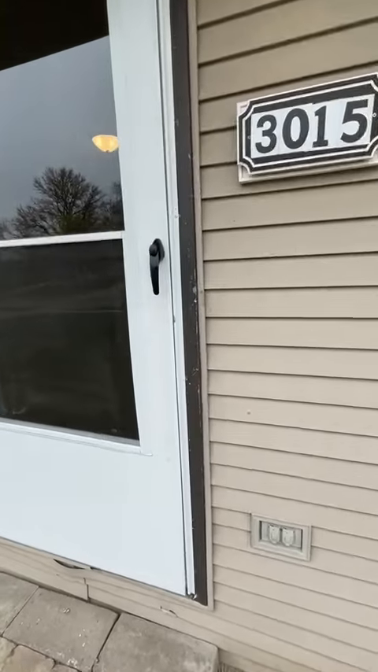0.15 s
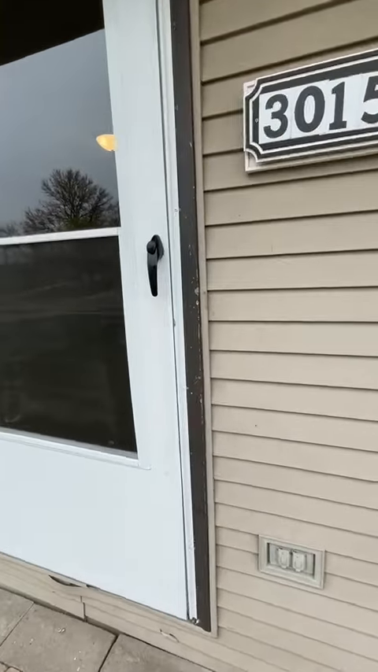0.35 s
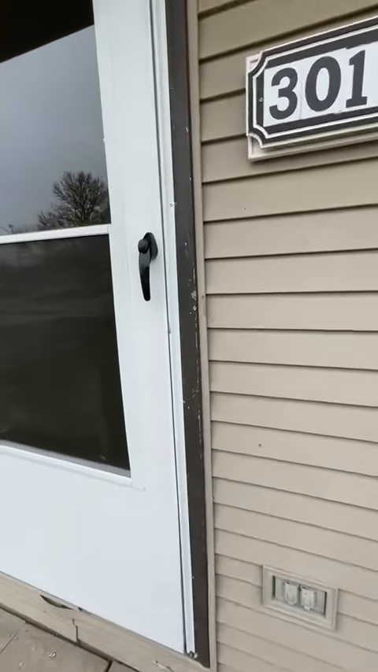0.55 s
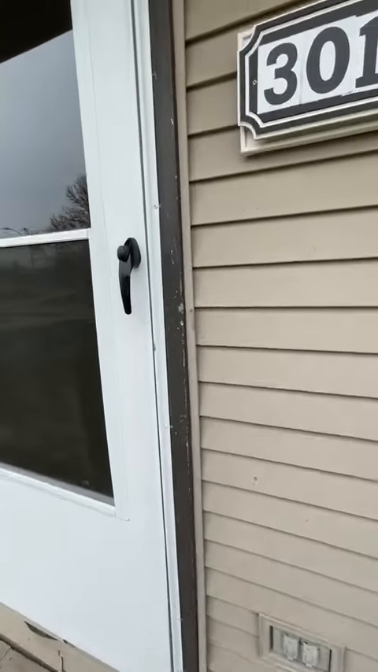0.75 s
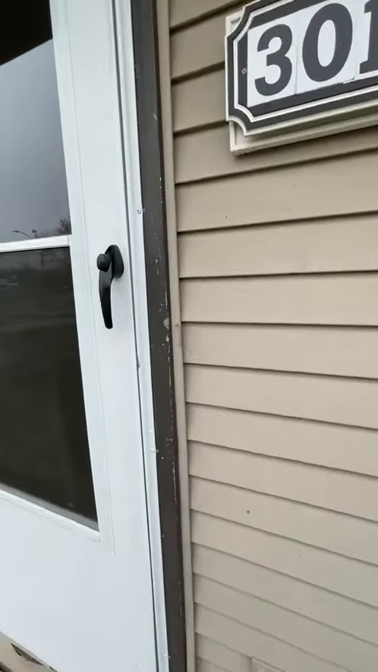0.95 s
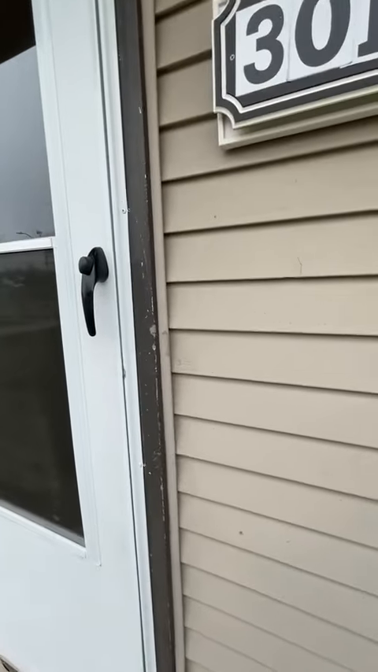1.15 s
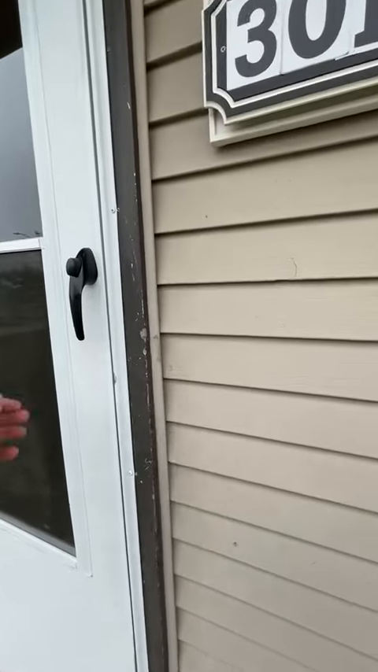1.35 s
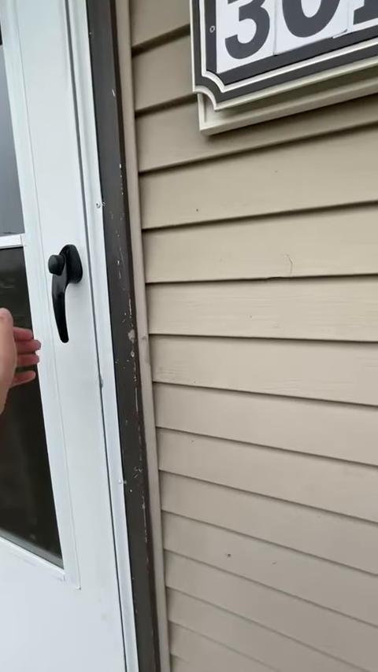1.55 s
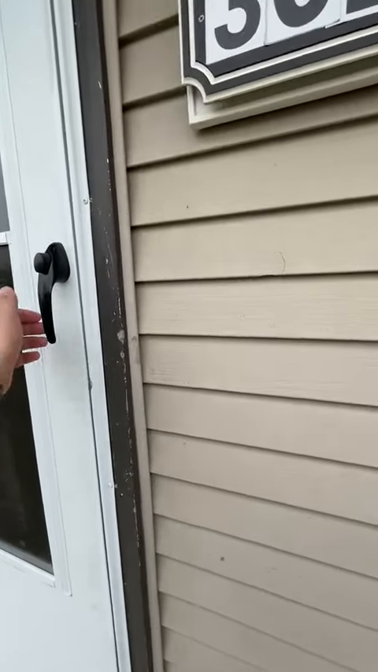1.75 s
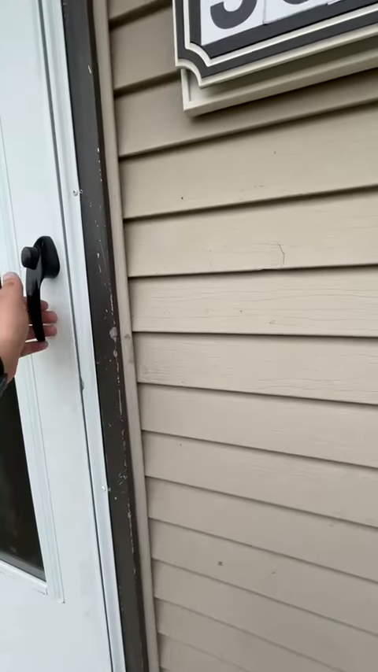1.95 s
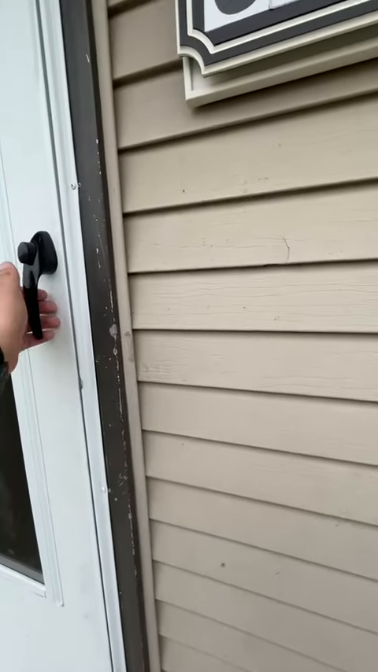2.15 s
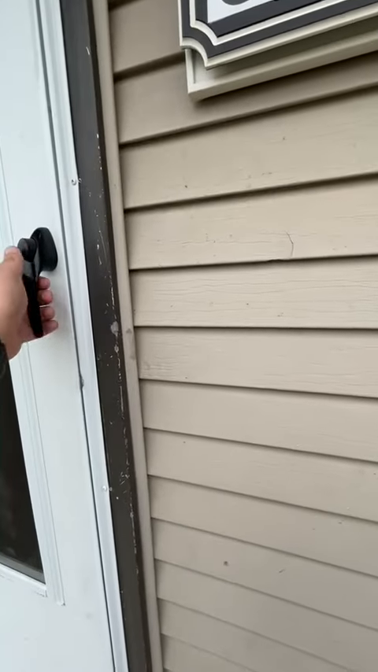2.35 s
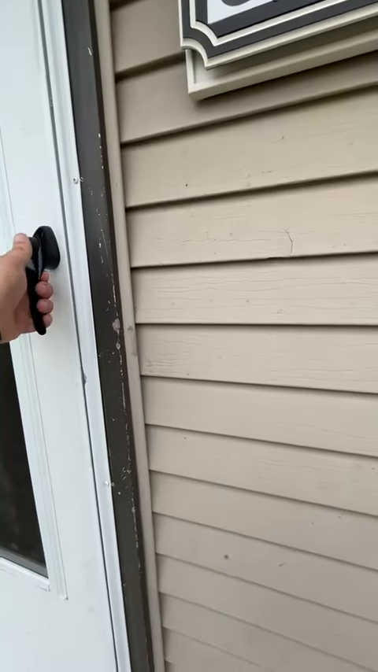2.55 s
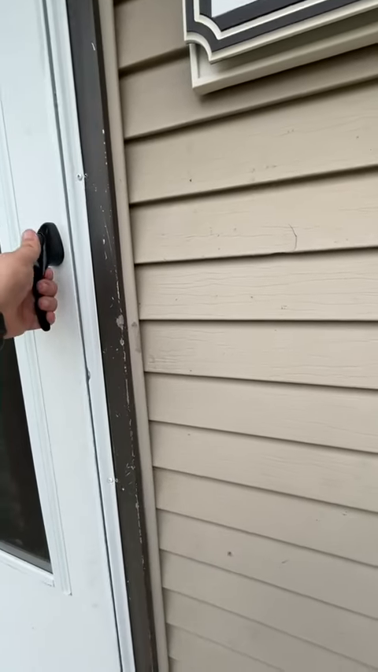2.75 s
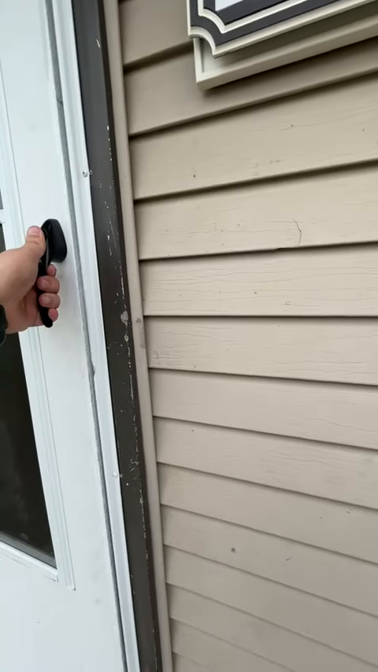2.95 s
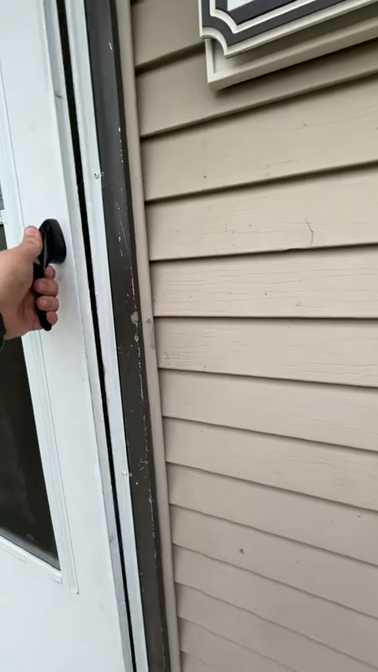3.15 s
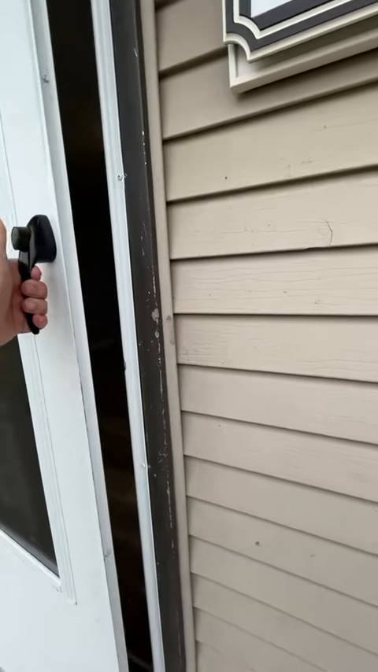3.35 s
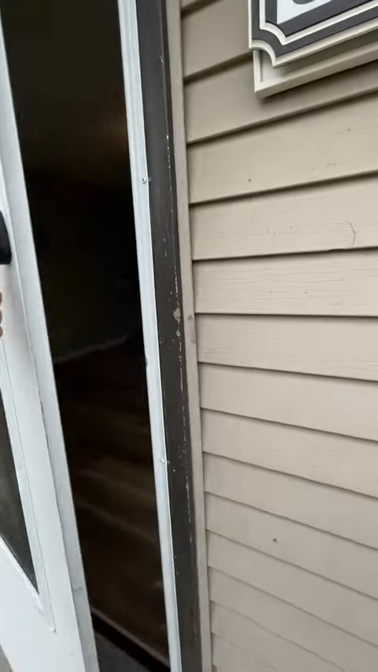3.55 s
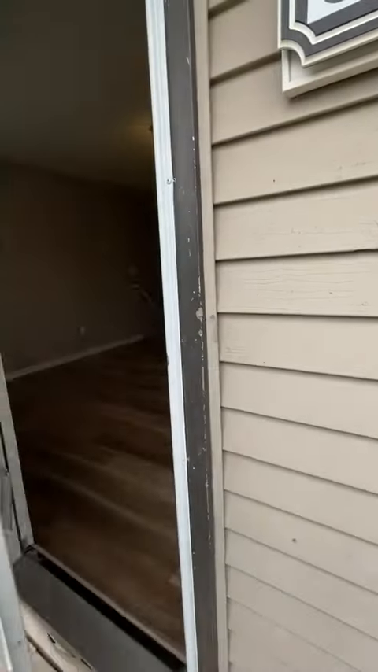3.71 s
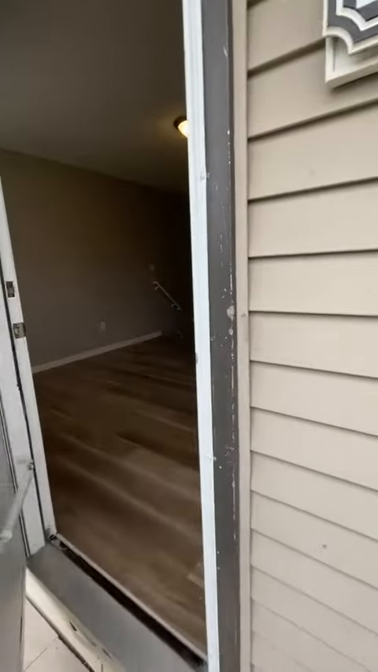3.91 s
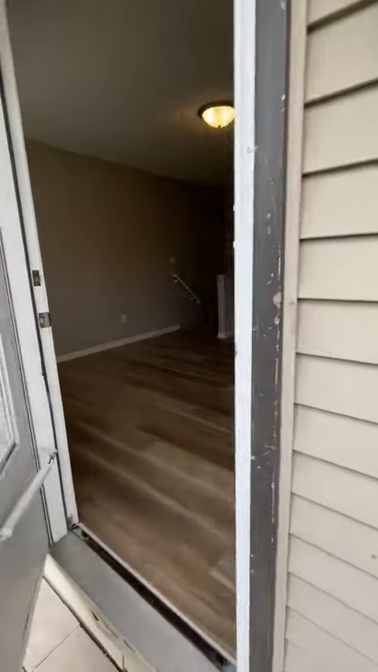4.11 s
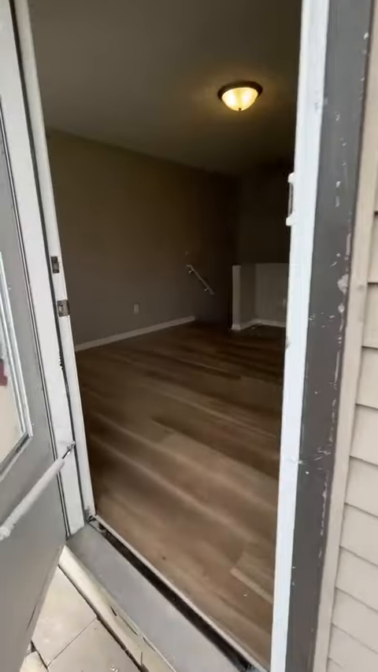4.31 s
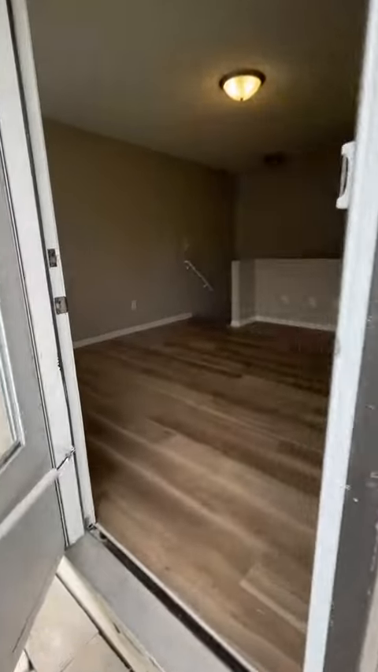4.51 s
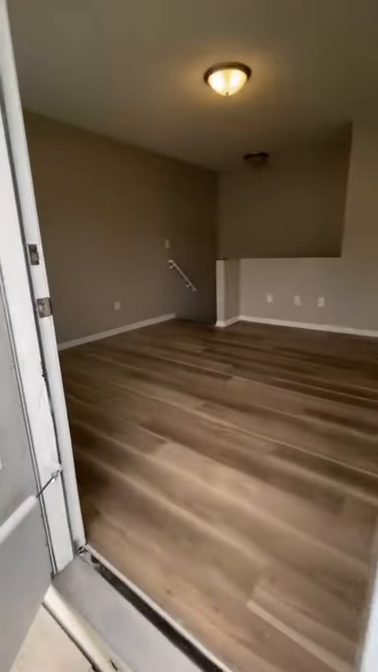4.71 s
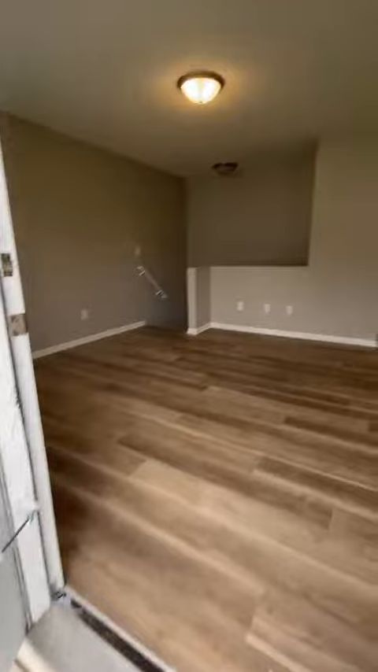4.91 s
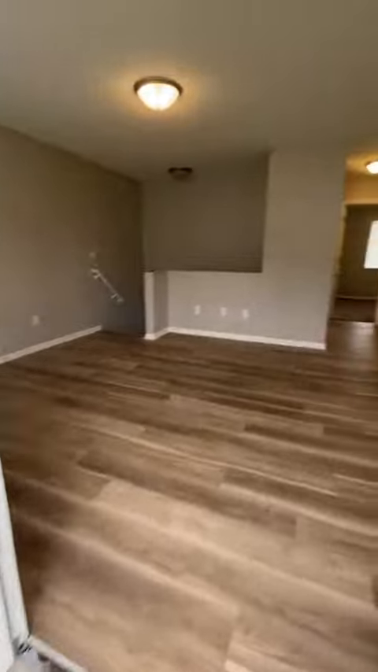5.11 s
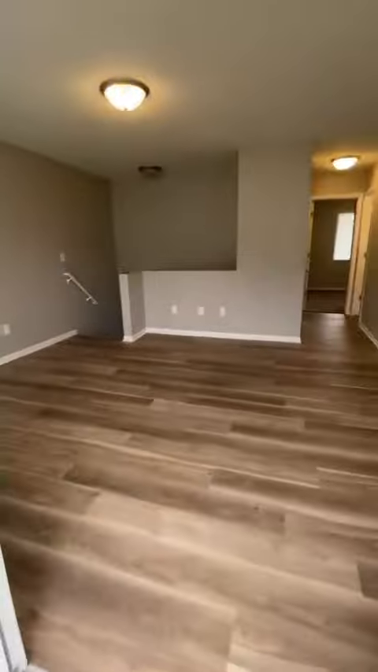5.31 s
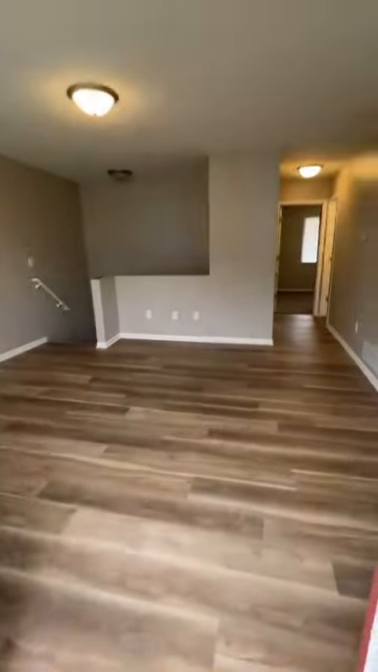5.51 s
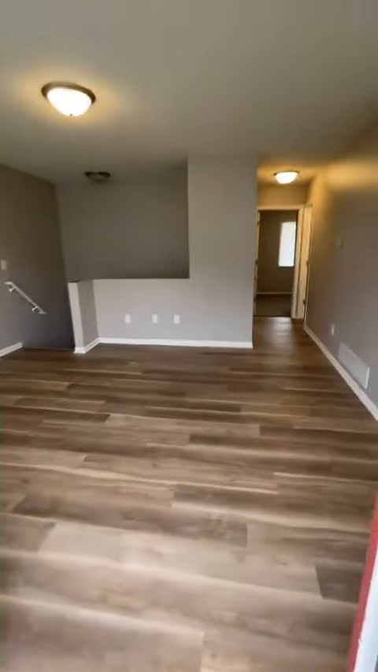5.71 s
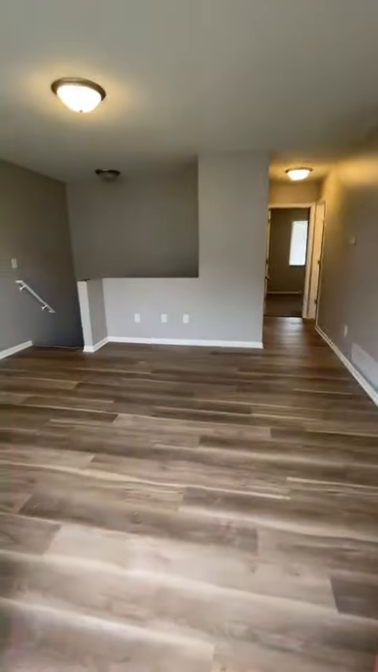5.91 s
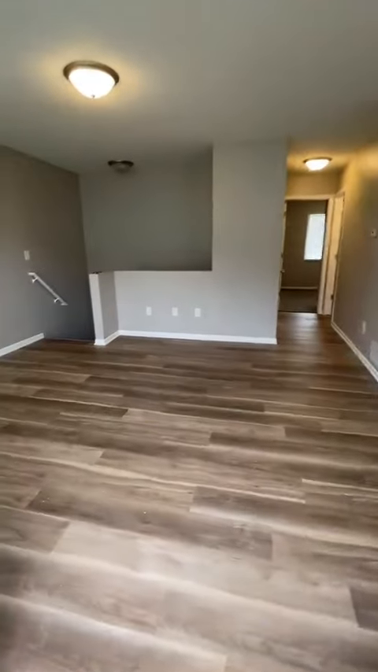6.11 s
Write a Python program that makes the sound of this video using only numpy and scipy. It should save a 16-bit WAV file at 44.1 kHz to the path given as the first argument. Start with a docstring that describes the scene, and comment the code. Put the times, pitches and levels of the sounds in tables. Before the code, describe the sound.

Over low traffic rumble and a faint whistling bird, a storm door's latch clacks twice, followed by small knocks and ticks.

```python
"""A light metal storm door is unlatched and pulled free of its frame as someone steps into an empty room.
The latch squeaks, and blows set the door and its panels ringing. Air hisses through the door closer,
the hinge sticks and slips in a creak, small parts tick, shoes knock and a jacket rustles.
Behind it a songbird whistles falling notes over distant traffic, all heard by a hand-held phone."""
import sys
import numpy as np
from scipy import signal
from scipy.fft import rfft, irfft, next_fast_len
from scipy.io import wavfile
from scipy.ndimage import uniform_filter1d

SR = 44100
rng = np.random.default_rng(int(sys.argv[2]) if len(sys.argv) > 2 else 0)


def persist_wave(psi):
    """Save psi, clipped to +-1, as 16-bit WAV."""
    counts = np.round(np.clip(psi, -1, 1) * 32767).astype(np.int16)
    wavfile.write(sys.argv[1], SR, np.atleast_2d(counts).T)


N = 271857
TIME = np.arange(N) / SR
FFT_SIZE = next_fast_len(N + SR)
HZ = np.arange(FFT_SIZE // 2 + 1) * SR / FFT_SIZE + 1e-3
STREET_LAG, HAND_LAG = 4, 20  # samples by which far and close sounds reach the right microphone later


def gain(db):
    """Turn decibels (dB) into a number to multiply by."""
    return 10 ** (np.asarray(db) / 20)


def unit_level(x):
    """Scale a sound to an average (rms) level of 1."""
    return x / np.sqrt(np.mean(x ** 2))


def unit_energy(x):
    """Scale each sound so that its squared samples add up to 1."""
    return x / np.sqrt(np.sum(x ** 2, axis=-1, keepdims=True))


def over_hz(table, hz):
    """Read between the rows of a (Hz, value) table, with octaves evenly spaced."""
    points_hz, values = np.transpose(table)
    return np.interp(np.log(hz), np.log(np.maximum(points_hz, 1)), values)


def over_time(table):
    """Turn a (seconds, dB) table into a gain for every sample."""
    return gain(np.interp(TIME, *np.transpose(table)))


def filtered(x, response):
    """Give each frequency of a sound its own gain."""
    return irfft(rfft(x, FFT_SIZE) * response, FFT_SIZE)[..., :N]


def octave_band(hz, octave):
    """A smooth filter that passes the frequencies around 2 ** octave Hz."""
    return np.cos(np.pi / 2 * np.clip(np.log2(hz) - octave, -1, 1)) ** 2


def ring_down(t, ring_s):
    """A fade that drops 60 dB in the ring time, ring_s."""
    return np.exp(-np.log(1000) * t / ring_s)


def wander(rate):
    """A smooth random curve, roughly between -1 and 1, with `rate` new targets a second."""
    hold = int(SR / rate)
    steps = np.repeat(rng.standard_normal(N // hold + 1), hold)
    return 1.3 * uniform_filter1d(uniform_filter1d(steps, hold), hold)[:N]


def grains(boost_db, samples):
    """Brief random boosts, mostly small, that roughen a hiss."""
    return gain(boost_db * rng.exponential(size=N // samples + 1)).repeat(samples)[:N]


def add(track, start_s, sound):
    """Mix a short sound into a track."""
    start = int(start_s * SR)
    first, last = max(start, 0), min(start + sound.shape[-1], N)
    track[..., first:last] += sound[..., first - start:last - start]


# How alike noise is in both channels. Each row: frequency in Hz, likeness from 0 (unrelated) to 1 (same).
STEREO_LIKENESS = [(25, .7), (60, 1), (130, 0.91), (290, 0.72), (640, 0), (1410, 0.7), (3100, 0.5),
                   (6820, 0.05), (15000, 0.2)]


def hiss(colour, flicker_db, rate):
    """Stereo noise whose octaves each flicker on their own; left and right are most alike in the bass."""
    alike = np.clip(over_hz(STEREO_LIKENESS, HZ), 0, 1)
    low_hz, top_hz = colour[0][0], colour[-1][0]
    mid, side = rfft(rng.standard_normal((2, FFT_SIZE))) * gain(over_hz(colour, HZ)) * (HZ < top_hz)
    pair = np.array([mid * np.sqrt(1 + alike) + sign * side * np.sqrt(1 - alike) for sign in (1, -1)])
    out = 0
    for octave in range(int(np.log2(low_hz)), int(np.log2(top_hz)) + 2):
        band = irfft(pair * octave_band(HZ, octave), FFT_SIZE)[:, :N]
        out = out + band * gain(flicker_db * wander(rate))
    return unit_level(out)


# The tone of distant traffic. Each row: frequency in Hz, relative level in dB.
TRAFFIC_COLOUR = [(12, -36.5), (20, -25.5), (59, 0), (90, 1), (120, -6), (167, -15.5), (216, -19.5),
                  (341, -21.5), (452, -25), (599, -29), (814, -26.5), (1670, -32), (3080, -39.5),
                  (5830, -57.5), (9000, -67.5), (11700, -78), (19800, -120)]
# The swell of its bass. Each row: time in seconds, level in dB.
RUMBLE_LEVELS = [(0, -48), (.5, -41.5), (1.9, -41.5), (2.8, -41), (3.3, -39.5), (3.9, -43.5), (4.3, -40),
                 (6.16, -44)]
# The drift of its treble. Each row: time in seconds, boost or cut in dB.
TREBLE_DRIFT = [(0, 4.5), (1.4, -12.5), (1.8, -3.5), (2.75, 1.5), (3.7, -7), (5, 3), (6.16, -4.5)]
# Wavering low hums from the street, and an electrical mains hum (near 120 Hz) that grows indoors.
# Each row: pitch in Hz, width in Hz, dB against the rumble on the porch, the same indoors.
LOW_HUMS = [(90.3, 5, -9, 0), (120.9, 2.5, -20, -7), (343, 14, -21, -24.5)]


def traffic_and_hum():
    """A wash of street noise, shaded by the walls indoors, over a swelling rumble and low hums."""
    wash = gain(-39) * hiss(TRAFFIC_COLOUR, flicker_db=.6, rate=8)
    bass = filtered(wash, 1 / (1 + (HZ / 170) ** 6))
    treble = filtered(wash, 1 - 1 / (1 + (HZ / 2510) ** 4))
    above_bass = wash - bass + treble * (over_time(TREBLE_DRIFT) - 1)
    doorway_s, crossing_s, shade_db = 4.57, 0.74, -1.5
    indoors = np.clip((TIME - doorway_s) / crossing_s, 0, 1)
    hum = 0
    for hz, width_hz, porch_db, indoors_db in LOW_HUMS:
        drone = filtered(rng.standard_normal(N), 1 / (1 + ((HZ - hz) / width_hz) ** 2))
        hum = hum + unit_level(drone) * gain(porch_db + (indoors_db - porch_db) * indoors)
    rumble = over_time(RUMBLE_LEVELS) * (unit_level(bass) + hum)
    left, right = above_bass * gain(shade_db * indoors) + rumble
    return np.array([left, np.roll(right, STREET_LAG)])


# The bird's whistles. Each row: start in seconds, first pitch in Hz, level in dB,
# where the note is loudest (0 is its start, 1 its end), length in seconds.
BIRD_NOTES = [(-.004, 4620, -62, 0.6, .07), (0.192, 3700, -59, 0.14, 0.048), (0.372, 4750, -59, .6, 0.068),
              (0.553, 5030, -58.5, .6, 0.085), (0.749, 4500, -53.5, 0.67, 0.087),
              (0.923, 4260, -55.5, 0.84, 0.072), (1.101, 4020, -56, 0.37, .078),
              (1.284, 4000, -53.5, .7, 0.087), (1.458, 3800, -55, 0.06, 0.085),
              (1.629, 4600, -64.5, 0.36, 0.095), (1.851, 3500, -58, .8, 0.072),
              (4.944, 4610, -68.5, .5, 0.056), (5.107, 4600, -64, .4, .06), (5.351, 4590, -63, 0.3, 0.052),
              (5.541, 4600, -52, 0.1, 0.055), (5.735, 4590, -53.5, 0.06, 0.057),
              (5.937, 4600, -57, 0.45, 0.056), (6.123, 4600, -62.5, 0.36, .06)]


def bird():
    """Pure notes slide down towards one pitch; echoes on the way make their loudness tremble."""
    target_hz, glide_s = 1477, .057
    song, waver = np.zeros(N), 1 + .012 * wander(60)
    for start, first_hz, db, loudest, length in BIRD_NOTES:
        t = np.arange(int(length * SR)) / SR
        hz = target_hz + (first_hz - target_hz) * np.exp(-t / glide_s)
        hz = hz * np.interp(start + t, TIME, waver)
        swell = np.interp(t / length, [0, np.clip(loudest, .1, .88), .9, 1], [.15, .8, .45, 0])
        add(song, start, gain(db) * swell * np.sin(2 * np.pi * np.cumsum(hz) / SR))
    song = song + gain(-7.5) * np.roll(song, int(.005 * SR))  # one quick echo
    song = song * gain(3 * wander(120))  # the tremble
    return np.array([song, .8 * np.roll(song, 1)])


# How long the porch and bare room echo. Each row: frequency in Hz, ring time in seconds.
ROOM_RING = [(100, 1), (600, 0.3), (1500, 0.67), (5000, 0.37), (12000, 0.045)]


def room(sound):
    """Wall echoes blur into fading noise, different left and right, that dies fastest in the treble."""
    t, tail = np.arange(SR) / SR, 0
    hz = np.arange(SR // 2 + 1) + 1
    for octave in range(6, 15):
        band = irfft(rfft(rng.standard_normal((2, SR))) * octave_band(hz, octave), SR)
        tail = tail + band * ring_down(t, over_hz(ROOM_RING, 2 ** octave))
    tail = tail * np.minimum(t / 0.0073, 1)
    return filtered(sound, rfft(tail / np.sqrt(np.sum(tail ** 2) / 2), FFT_SIZE))


# The tone of rubbing cloth. Each row: frequency in Hz, relative level in dB.
CLOTH_COLOUR = [(2350, -31.5), (4000, -2.5), (5790, -9), (9220, -2.5), (10000, -12.5), (11400, -33),
                (12300, -16), (13100, -26), (13800, -40), (15000, -35)]
# How loudly the jacket rustles. Each row: time in seconds, level in dB.
RUSTLE_LEVELS = [(0, -92), (.46, -78.5), (.9, -74), (1.3, -64.5), (1.66, -76.5), (2.13, -87.5),
                 (2.5, -72.5), (2.9, -72), (3.7, -80), (4.13, -71.5), (4.53, -72.5), (4.75, -68.5),
                 (5.2, -66.5), (5.45, -71.5), (5.65, -66.5), (6.0, -76), (6.16, -77)]


def jacket():
    """Cloth hisses, roughened by scattered crackles of its folds."""
    cloth = hiss(CLOTH_COLOUR, flicker_db=1.2, rate=25)
    return unit_level(cloth * grains(boost_db=1.4, samples=40)) * over_time(RUSTLE_LEVELS)


def tap(hz, width_hz, ring_s, brightness):
    """A noise burst around one pitch, plus some broad treble; its ring time is held to 5-80 ms."""
    t = np.arange(SR // 10) / SR
    f = np.arange(len(t) // 2 + 1) * SR / len(t)
    resonance = 1 / (1 + ((f - hz) / width_hz) ** 2)
    treble = brightness * (f > 1500) / (1 + (f / 9800) ** 10)
    noise = irfft(rfft(rng.standard_normal(len(t))) * (resonance + treble), len(t))
    fade = ring_down(t, np.clip(ring_s, .005, .08)) * np.minimum(t / 0.0006, 1)
    return unit_energy(noise * fade) * np.sqrt(np.sum(fade ** 2))


# Ticks of hardware and zips. Each row: start in seconds, level in dB, pitch in Hz, left minus right in dB.
HARDWARE_TICKS = [(.314, -73, 8600, 0), (.434, -66, 7000, 0), (0.463, -58.5, 8120, -3),
                  (0.4724, -61, 4800, -2), (0.546, -57, 7940, 5), (0.848, -60, 7760, -3.5),
                  (1.874, -68, 8000, 2), (2.315, -63, 4970, 5), (2.5355, -55.5, 4270, 11),
                  (2.7995, -60, 4814, 12), (2.843, -55, 4890, 6), (2.879, -49.5, 5040, 0),
                  (3.0427, -43, 4480, 10), (3.1098, -47, 4500, 8), (3.6386, -57, 8230, -9),
                  (4.3064, -65, 4550, -1.5), (4.344, -67, 8940, -7), (4.4283, -55.5, 6400, 2.5),
                  (4.5496, -57, 4540, 3.5), (4.725, -52, 4870, 9), (4.81, -60, 4830, 14),
                  (4.896, -54, 6440, 3), (5.0223, -44.5, 7250, 6), (5.087, -37, 7900, 2.5),
                  (5.262, -51, 7500, -2), (5.431, -54, 4770, 0), (5.456, -58, 3200, -14),
                  (5.488, -54.5, 8200, 6), (5.5576, -58, 7960, -4), (5.695, -58.5, 5660, 15),
                  (5.744, -61, 8000, 0), (5.829, -60, 8500, -1), (5.972, -49.5, 7700, 7)]


def ticks():
    """Small parts tick brightly beside the phone; weaker ticks ring for less time."""
    out = np.zeros((2, N))
    for start, db, hz, pan_db in HARDWARE_TICKS:
        tick = tap(hz, width_hz=1000, ring_s=0.052 * gain(0.4 * (db + 41)), brightness=0.19)
        add(out, start, tick * gain([[db + pan_db / 2], [db - pan_db / 2]]))
    return np.array([out[0], np.roll(out[1], HAND_LAG)])


# Small knocks, and a few thin, high pings. Each row: start in seconds, level in dB, pitch in Hz,
# width in Hz, ring time in seconds (tap caps it at 0.08).
KNOCKS_AND_PINGS = [(.5468, -42, 730, 250, 0.032), (3.4585, -40, 2000, 400, 0.1),
                    (3.462, -46, 850, 150, 0.087), (3.545, -47.5, 878, 150, 0.055),
                    (4.229, -48.5, 2290, 200, .03), (4.243, -38, 1090, 450, 0.039),
                    (4.618, -42, 2830, 90, 0.17), (4.6186, -42.5, 1000, 200, 0.046),
                    (4.728, -53, 2000, 900, 0.05), (4.81, -49, 2180, 250, 0.048),
                    (4.812, -51, 950, 200, .04), (5.087, -51, 2300, 1200, 0.025),
                    (5.43, -47.5, 2470, 300, .03), (5.5975, -37, 2215, 1200, 0.014),
                    (5.76, -56, 5030, 119.7, 0.053), (6.105, -61, 3980, 120, .06)]


def knocks_and_pings():
    """Shoes, sill and loose fittings knock; a few narrow, high bursts sound as thin pings."""
    out = np.zeros(N)
    for start, db, hz, width_hz, ring_s in KNOCKS_AND_PINGS:
        add(out, start, gain(db) * tap(hz, width_hz, ring_s, brightness=0.036))
    return np.array([out, np.roll(out, STREET_LAG)])


# The hinge's creaks. Each row: start in seconds, end in seconds, slips per second, peak level in dB.
HINGE_CREAKS = [(4.051, 4.126, 60, -51), (4.161, 4.167, 49, -46), (4.192, 4.262, 70, -48.5),
                (4.27, 4.295, 50, -52)]


def hinge():
    """The hinge sticks and slips; each slip is a sharp metal click, uneven in timing and strength."""
    pitch_hz, width_hz = 6600, 3500
    out, t = np.zeros(N), np.arange(200) / SR
    decay = np.pi * width_hz * t
    click = np.e * decay * np.exp(-decay) * np.sin(2 * np.pi * pitch_hz * t)
    for start, end, rate, db in HINGE_CREAKS:
        chance = rng.standard_normal((12, 2))
        for slip_s, (late, louder) in zip(np.arange(start, end, 1 / rate), chance):
            add(out, slip_s + .06 * late / rate, gain(db + 2.5 * louder) * click)
    return out


# The tone of air in the closer's valve. Each row: frequency in Hz, relative level in dB.
AIR_COLOUR = [(600, -20.5), (860, -7), (1400, -13.5), (2060, 0), (2810, -8.5), (3600, -13.5), (5000, -4),
              (6390, -12.5), (8940, -15), (10900, -33.5), (13000, -37), (14000, -46.5)]
# The tone of the brushing weather seal. Each row: frequency in Hz, relative level in dB.
SEAL_COLOUR = [(3000, -31.5), (4200, -10), (6000, -3), (9200, 2), (11400, -20.5), (13100, -28),
               (15000, -42.5)]
# The door's two jerks. Each row: start in seconds, air level in dB, seal level in dB,
# how fast the air fades in dB per second.
DOOR_JERKS = [(2.95, -39, -46.5, 108.5), (3.25, -46.5, -46.5, 34)]


def closer_and_seal():
    """At each jerk air sputters through the closer's valve and the seal brushes the frame, dying sooner."""
    air, seal = 0, 0
    for start, air_db, seal_db, fade_db_per_s in DOOR_JERKS:
        since = np.maximum(TIME - start, 0)
        rise = np.minimum(since / 0.03, 1)
        air = air + rise * gain(air_db - fade_db_per_s * since)
        seal = seal + rise * gain(seal_db - 2.5 * fade_db_per_s * since)
    sputter = unit_level(grains(boost_db=2, samples=100))
    valve = air * sputter * hiss(AIR_COLOUR, flicker_db=4.5, rate=16)
    return valve + seal * hiss(SEAL_COLOUR, flicker_db=0.5, rate=92)


def latch_squeak():
    """The latch tongue slides over its plate: two close tones beat until it drops, leaving a faint ring."""
    start_s, length_s, low_hz, high_hz = 2.9375, 0.0115, 2370, 2591
    out, t = np.zeros(N), np.arange(SR // 10) / SR
    from_middle = t - length_s / 2  # the tones cancel halfway through the slide
    tones = np.cos(2 * np.pi * low_hz * from_middle) - np.cos(2 * np.pi * high_hz * from_middle)
    slide = np.clip(t / 0.0015, 0, 1) * np.clip((length_s - t) / 0.00078, 0, 1)
    ring = gain(-19) * np.exp(-t / .014) * (t > .002)
    add(out, start_s, gain(-13) * tones * np.maximum(slide, ring))
    return out


# The tones (modes) of door and frame. Each row: pitch in Hz, relative level in dB, ring time in seconds.
DOOR_MODES = [(87.6, 2.5, 0.21), (120, 1.5, 0.073), (162.5, 3, 0.093), (217.5, -3.5, 0.093),
              (278.3, -2.5, 0.1), (342, -3, 0.16), (404, -5, 0.055), (637, -6.5, 0.045), (703, 1, 0.055),
              (903, -5.5, 0.024), (981.5, -1, 0.04), (1108, -3.5, 0.047), (1240, -8.5, .025),
              (1436, -0.5, 0.025), (1770, -5, 0.02), (2114, -8, 0.02), (2350, -4, 0.044),
              (4000, -9.5, 0.024), (4780, -5.5, 0.02), (5340, -3, 0.026), (5760, -0.5, 0.015),
              (6300, -4.5, 0.014), (7800, -0.5, 0.01), (8080, -3, 0.025), (8550, -11, 0.011),
              (9820, -12.5, 0.013)]
# Blows on the door. Each row: start in seconds, relative level in dB, treble tilt in dB per octave,
# four boosts in dB (bass, door leaf, low panel and high panel modes), rattle fade time in seconds.
DOOR_BLOWS = [(2.586, -42, -1.5, -42, -42, -23, 4, 0.0057),
              (2.6044, -44, -1.5, -39, -40, -15, 10.5, 0.0025),
              (2.6057, -44, 0, -38, -37.5, -14.5, 10, 0.0028), (2.9387, -26, 1, -20.5, -19.5, 12, 7, 0.005),
              (2.945, -33.5, -1, 0, 8, 6, 15, 0.0051), (2.955, -33.5, -3, 12.5, 5, -9.5, 3, 0.0066),
              (2.994, -43, 1, 5, 6.5, -15, -6.5, 0.0049), (3.231, -35.5, -3.5, -24.5, -20, -10.5, 0, 0.023),
              (3.2485, -30, -1.5, -16, -11, -6.5, -8.5, 0.0031),
              (3.2523, -25, 3, -30.5, -30.5, -25, -20.5, 0.002),
              (3.2551, -23, -1, -13.5, -4.5, -14, -5.5, 0.0049),
              (3.259, -29, -1.5, -1, -2, -10.5, -7.5, 0.0072),
              (3.272, -29.5, -4, -18, -13, -13.5, -7.5, 0.0042),
              (3.28, -33.5, -6.5, -13.5, -11.5, -8.5, -8, 0.0058)]


def door():
    """Each blow is a short rattle that rings the door's modes, with a crack and a shiver of the glass."""
    out, t = np.zeros((2, N)), np.arange(SR // 3) / SR
    f = np.arange(len(t) // 2 + 1) * SR / len(t) + 1
    hz, mode_db, ring_s = np.transpose(DOOR_MODES)[:, :, None]
    modes = ring_down(t, ring_s) * np.sin(2 * np.pi * hz * t)
    pushed = modes * np.minimum(t / 0.0024, 1)  # the panels take a blow as one soft push
    rise = np.minimum(t / 0.00086, 1)
    crack_band = (1 / (1 + (f / 9500) ** 6) + gain(-20)) / (1 + (850 / f) ** 6)
    shiver = gain(-15) * unit_energy(np.exp(-t / 0.022))
    for start, db, tilt_db, *boosts_db, rattle_s in DOOR_BLOWS:
        chance = rng.standard_normal((2, len(t) + len(DOOR_MODES)))
        noise, scatter = chance[:, :len(t)], chance[:, len(t):]
        noise[1] = .5 * noise[0] + np.sqrt(.75) * noise[1]  # right is half like left
        fade = np.exp(-t / rattle_s)
        rattle = noise[0] * fade * rise
        rattled = signal.fftconvolve(modes, rattle[None], axes=1)[:, :len(t)]
        ringing = unit_energy(np.where(hz < 1300, pushed, rattled))
        mix_db = mode_db + tilt_db * np.log2(np.maximum(hz, 700) / 1000)
        mix_db = mix_db + np.select([hz < 190, hz < 500, hz < 800, hz < 1300], boosts_db)
        tones = gain(mix_db.T + 1.5 * scatter) @ ringing  # each microphone hears its own mix
        # Modes too crowded to tell apart merge into a noisy crack and a longer shiver.
        tilt = gain(tilt_db * np.log2(np.maximum(f, 700) / 1000))
        crowded = irfft(rfft(noise) * tilt * crack_band, len(t)) * rise
        crack = gain(12) * crowded * (unit_energy(fade) + shiver)
        add(out, start, gain(db) * np.sqrt(SR / 400) * (tones + crack))
    return out


# The door's tone at the right microphone. Each row: frequency in Hz, right minus left in dB.
DOOR_RIGHT_COLOUR = [(200, 0.5), (350, 1), (650, -5), (950, -2.5), (1400, 4), (2000, -0.5), (2500, 1.5),
                     (4500, -1.5), (5700, -3), (7500, -0.5), (9500, 0.5), (12000, -5)]


def place_door(sound):
    """The door is on the left, so it reaches the right later; its broad panels lag less than its latch."""
    left, right = sound
    panel_share = 1 / (1 + (HZ / 1650) ** 8)
    lag_s = .0001 * panel_share + HAND_LAG / SR * (1 - panel_share)
    delay = np.exp(-2j * np.pi * HZ * lag_s)
    return np.array([left, filtered(right, gain(over_hz(DOOR_RIGHT_COLOUR, HZ)) * delay)])


def scene():
    """Mix the door, the small sounds and the bird with their echo, then add the rumble and hisses."""
    blows = door()
    small_sounds = ticks() + knocks_and_pings() + hinge()
    song = bird()
    echo = room(gain(-25) * blows[0] + gain(-11) * (small_sounds[0] + song[0]))
    door_and_latch = place_door(blows + latch_squeak())
    return door_and_latch + small_sounds + song + echo + traffic_and_hum() + jacket() + closer_and_seal()


# The balance of the phone's two microphones. Each row: frequency in Hz, left minus right in dB.
MIC_BALANCE = [(60, -0.5), (110, -1.0), (200, -1.5), (380, -1.5), (700, 3.0), (1290, 1.0), (2380, 0.0),
               (4400, 3.5), (7500, -3.5), (11000, -8), (15000, -2)]


def record(dry):
    """The phone colours each side, softens deep bass and top treble, rounds peaks and cuts above 16 kHz."""
    balance = gain(over_hz(MIC_BALANCE, HZ) / 2)
    roll_off = 1 / np.sqrt((1 + (HZ / 13200) ** 24) * (1 + (38 / HZ) ** 4))
    coloured = filtered(dry, np.array([balance, 1 / balance]) * roll_off)
    rounded = .95 * np.tanh(coloured / .95)
    return signal.sosfilt(signal.ellip(8, .2, 70, 16000, fs=SR, output="sos"), rounded)


dry = scene()
out = record(dry)
persist_wave(out)
```